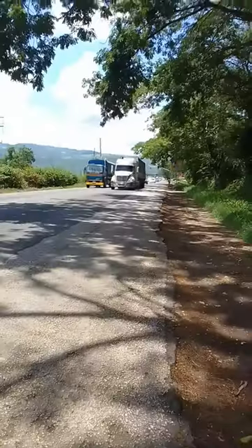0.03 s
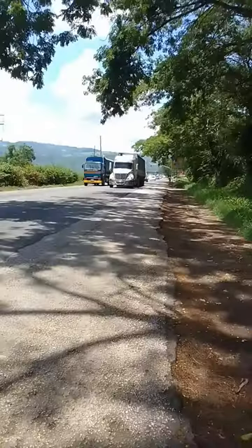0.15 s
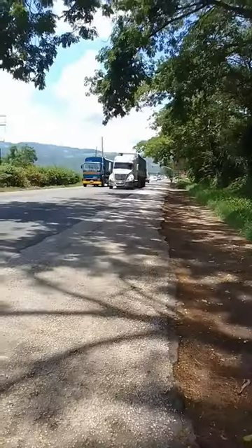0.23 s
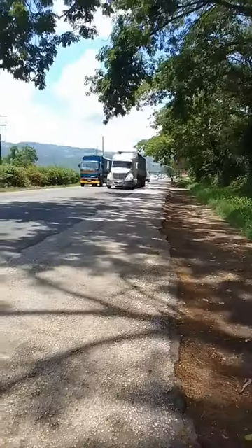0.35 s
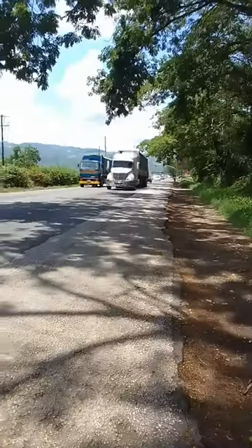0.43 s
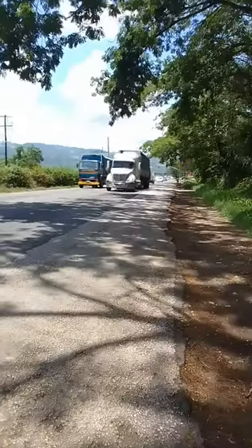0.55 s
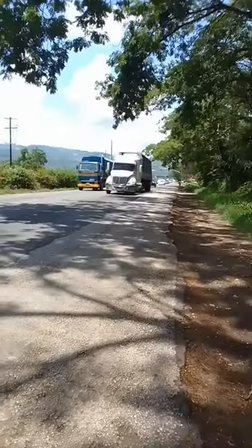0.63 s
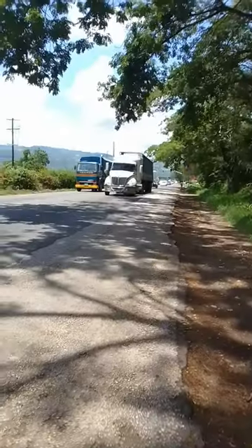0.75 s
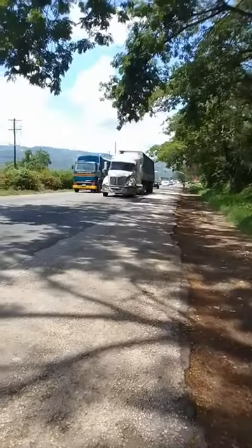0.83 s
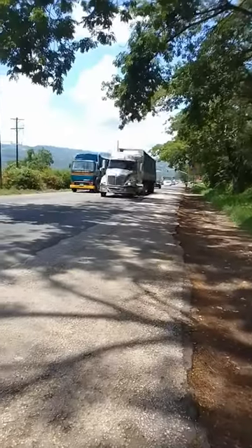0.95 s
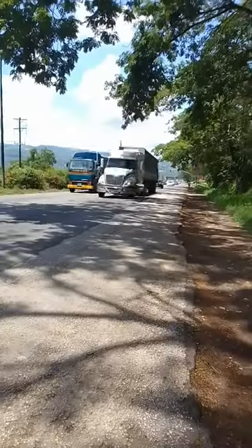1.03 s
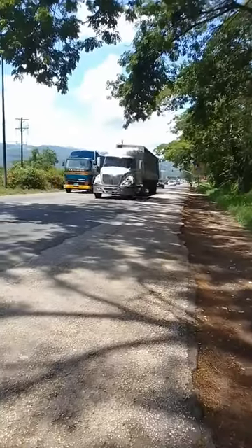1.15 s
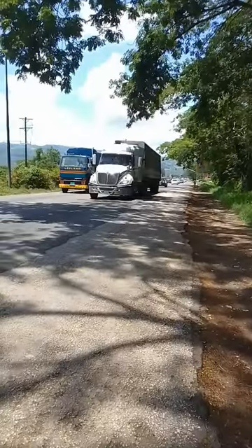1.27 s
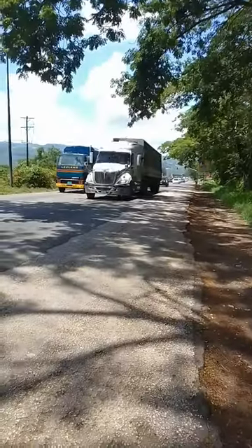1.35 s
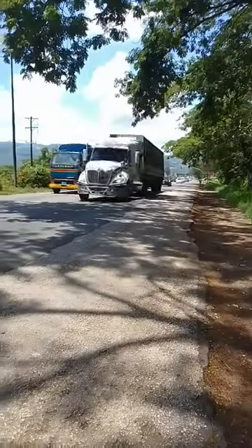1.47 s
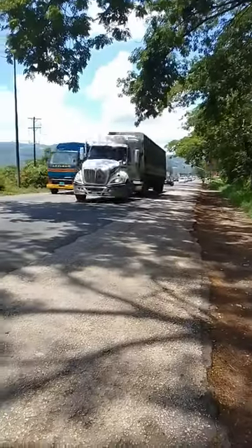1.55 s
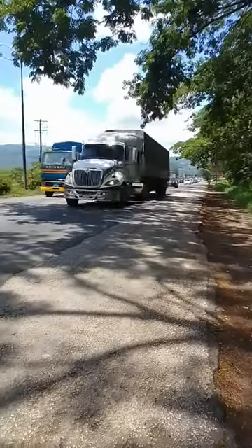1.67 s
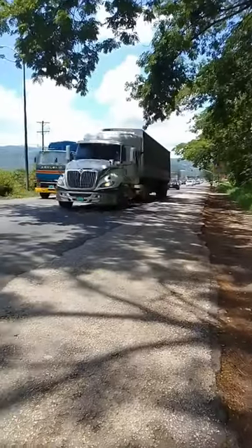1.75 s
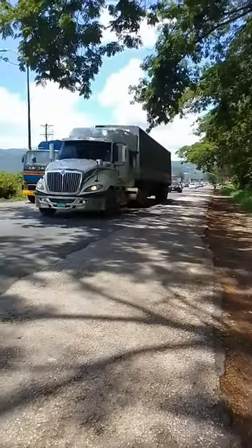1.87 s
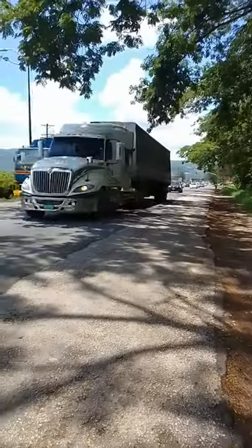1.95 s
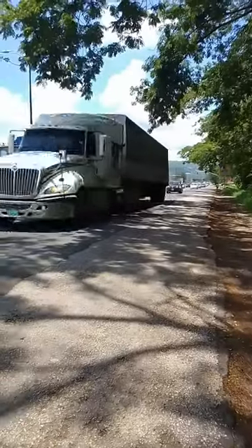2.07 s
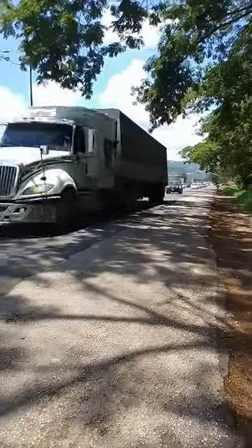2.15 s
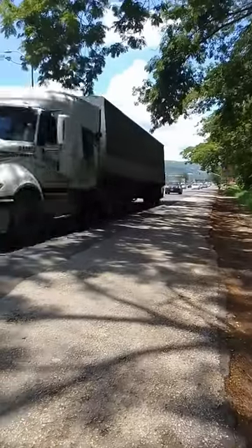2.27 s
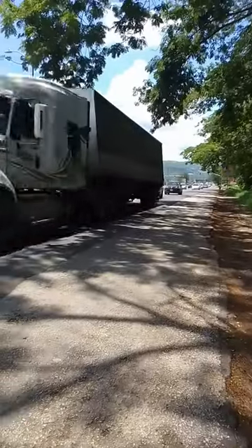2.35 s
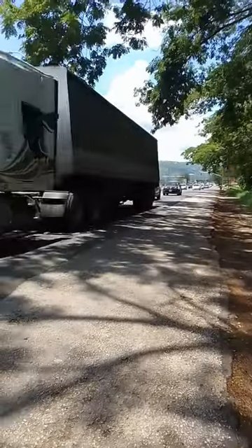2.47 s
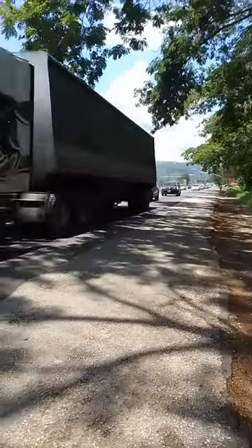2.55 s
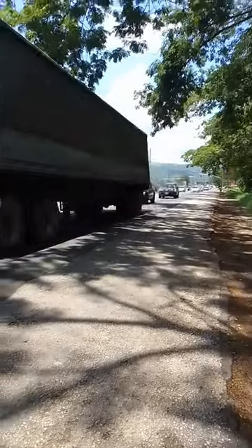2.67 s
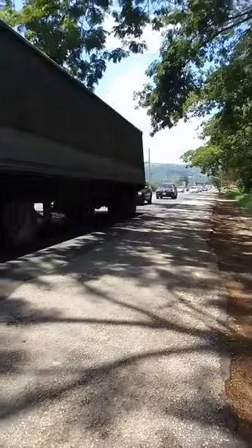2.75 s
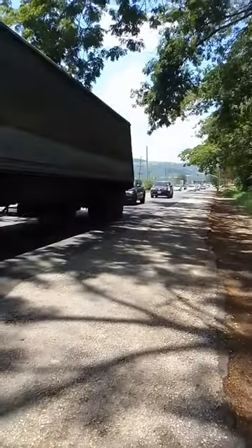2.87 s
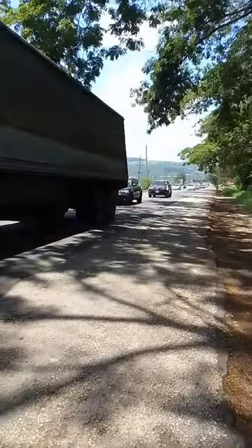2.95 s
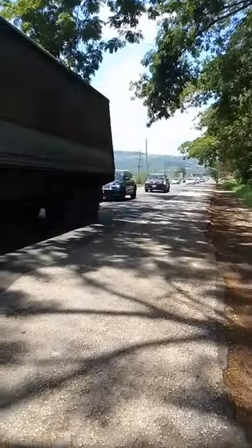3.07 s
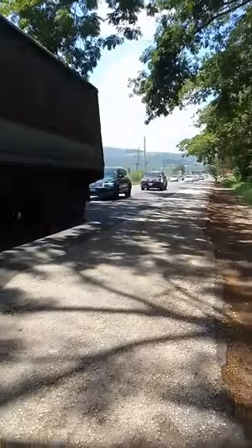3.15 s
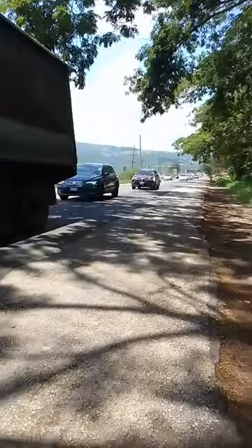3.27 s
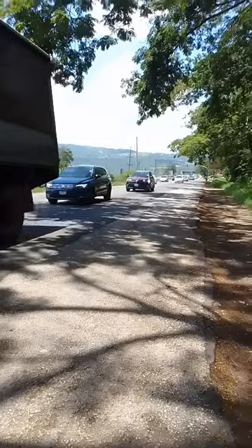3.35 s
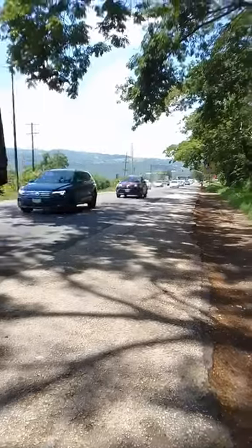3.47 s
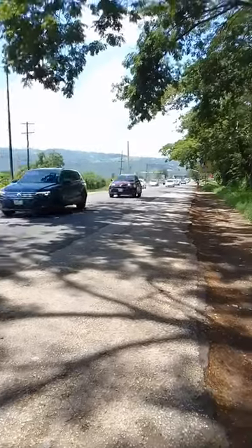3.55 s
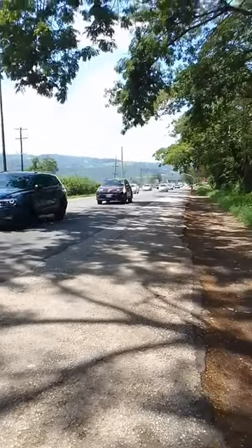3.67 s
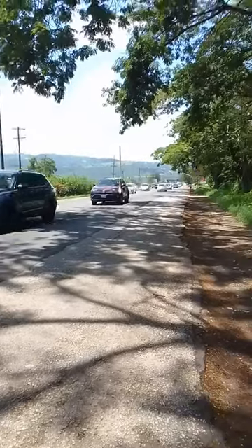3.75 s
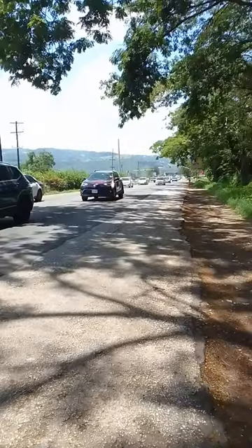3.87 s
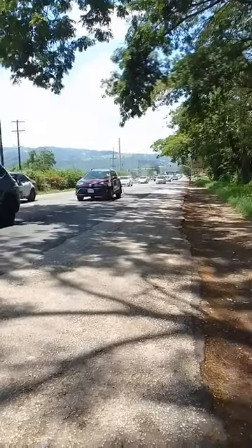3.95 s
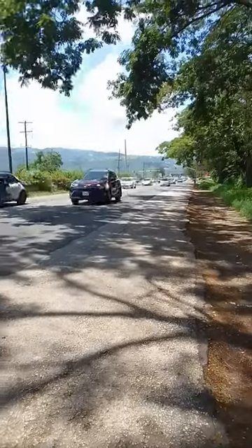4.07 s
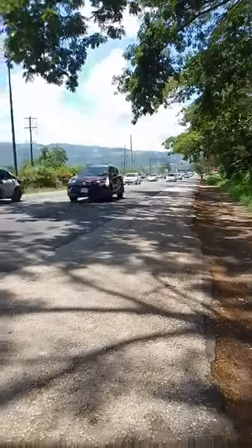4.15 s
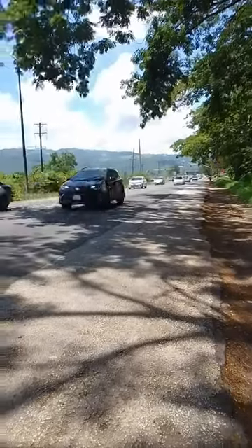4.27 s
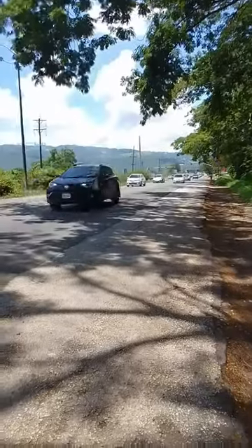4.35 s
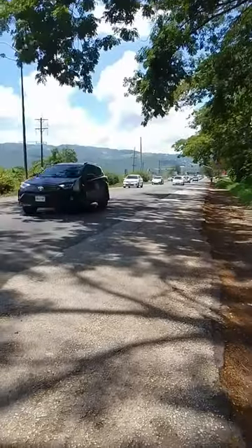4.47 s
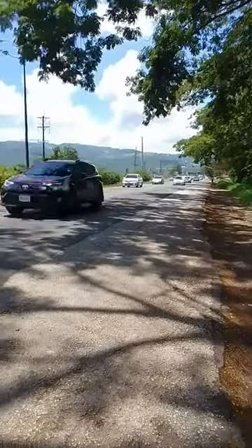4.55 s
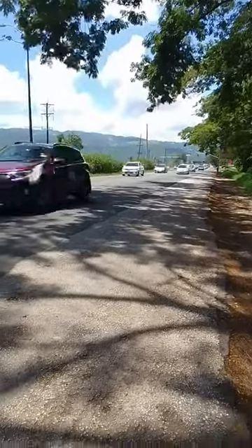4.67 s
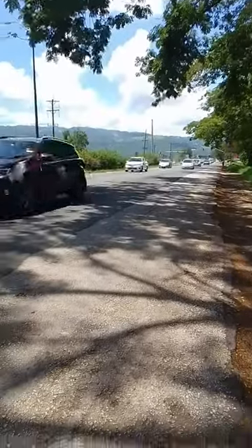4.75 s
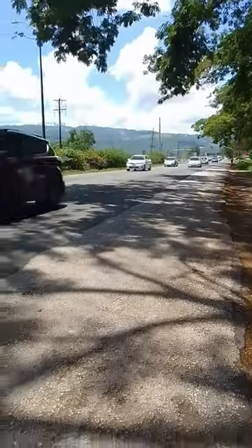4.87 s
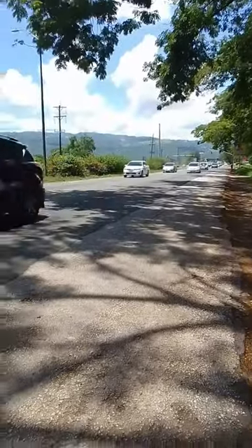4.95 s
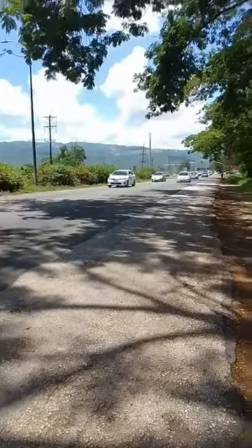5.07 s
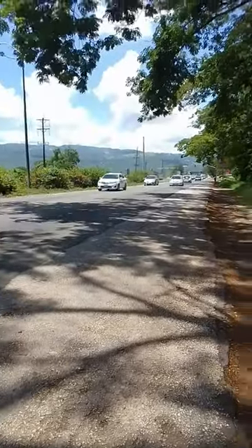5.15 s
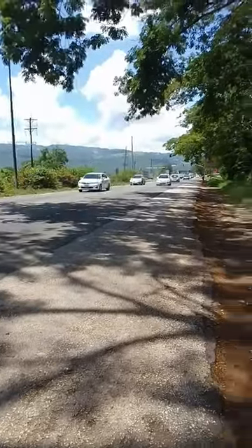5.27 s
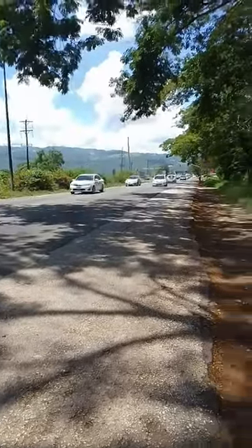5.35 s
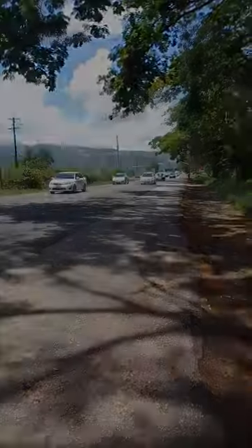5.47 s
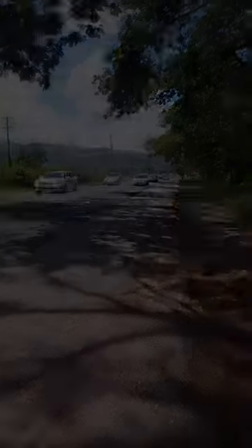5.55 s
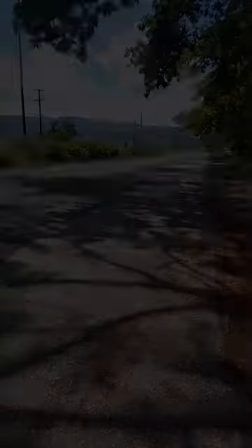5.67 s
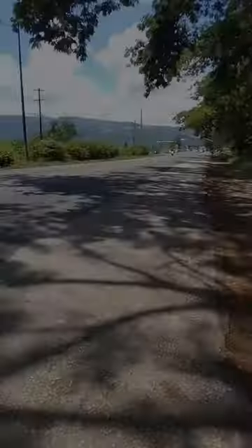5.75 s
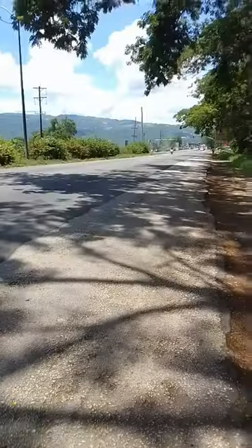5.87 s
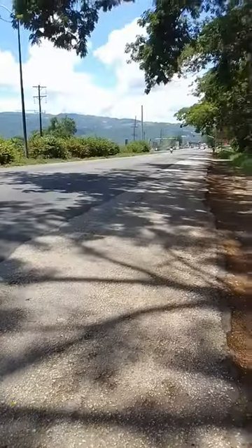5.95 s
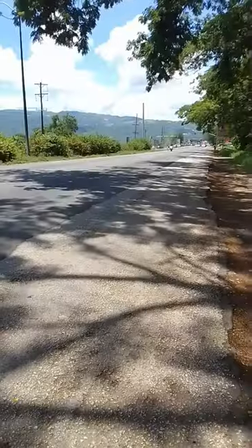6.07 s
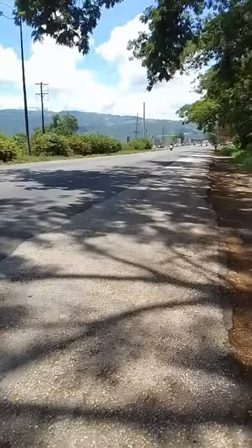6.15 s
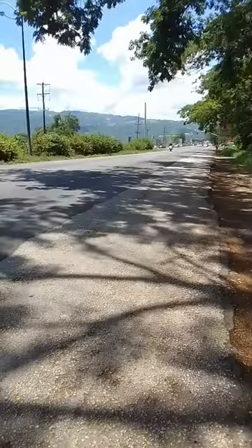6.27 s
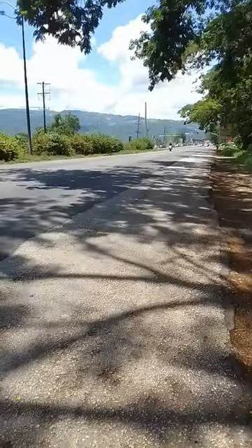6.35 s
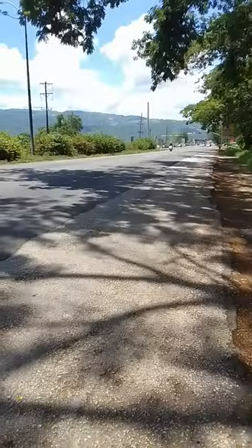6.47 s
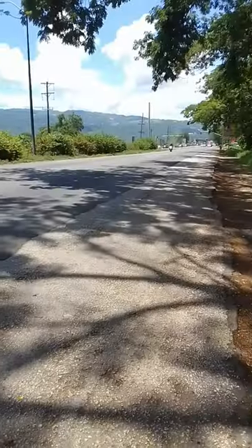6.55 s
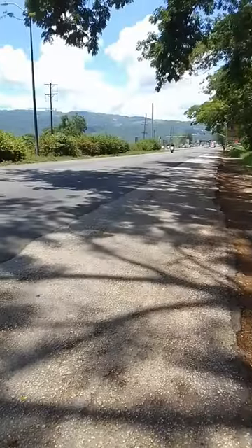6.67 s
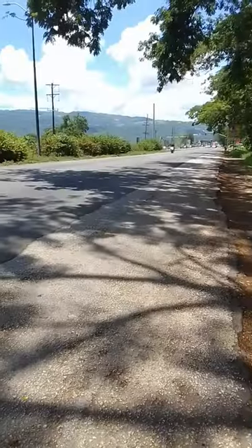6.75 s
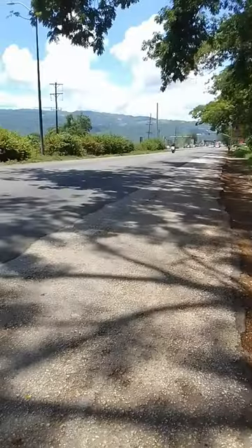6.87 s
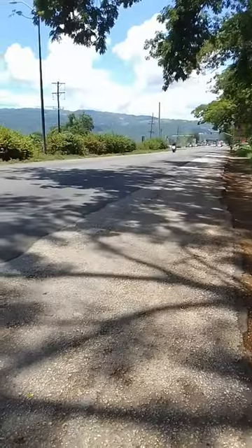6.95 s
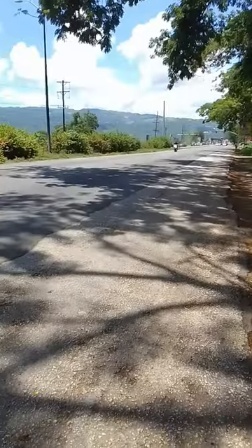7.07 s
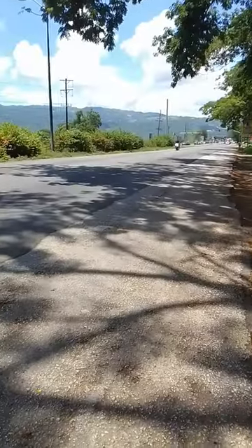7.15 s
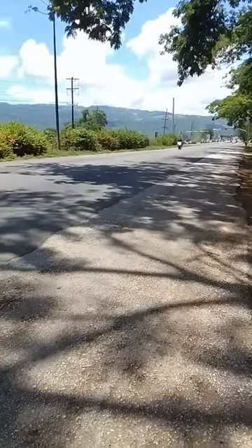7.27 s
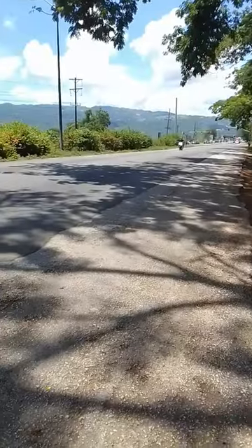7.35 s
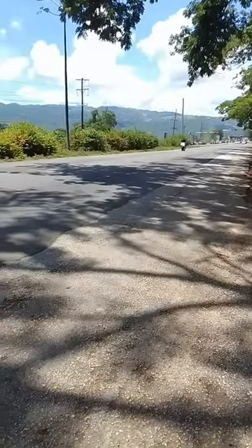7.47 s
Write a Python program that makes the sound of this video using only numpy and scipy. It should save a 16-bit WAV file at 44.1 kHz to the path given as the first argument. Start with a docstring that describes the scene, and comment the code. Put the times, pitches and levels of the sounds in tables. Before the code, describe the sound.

A low thud opens the sound as a diesel semi approaches along an open road, its throbbing drone growing and turning raspier at about 1 second. From 2.4 to 4 seconds it passes close by, with booming exhaust and surges of tyre roar and gritty hiss that overload the small microphone. Three short two-note horn toots sound at about 3, 3.5 and 3.8 seconds, each quieter than the last. Brief puffs of brake air come between 3 and 4.7 seconds, with thin, high squeaks from 3.8 to 5. A second truck passes at around 4.5 to 5 seconds, one cylinder knocking, and starts to recede. At 5.6 seconds everything cuts to silence. From 6.4 seconds a much quieter, distant motorcycle drones over faint road noise, dipping and burbling through a gear change at about 7.3 seconds.

```python
"""A diesel semi bears down and passes close by: booming exhaust, roaring and hissing tyres, three horn toots.
A second truck follows with one knocking cylinder, puffs of brake air and thin squeaks; the small
microphone overloads. After a silent break a distant motorcycle drones and changes gear.
The diesels are firing pulses and throbbing noise, coloured by pipe and block; the tyres are shaped noise;
horn and motorcycle are stacks of wavering harmonics."""
import sys
import numpy as np
from scipy.fft import rfft, irfft, next_fast_len
from scipy.io import wavfile
from scipy.ndimage import map_coordinates

SR = 44100
rng = np.random.default_rng(int(sys.argv[2]) if len(sys.argv) > 2 else 0)


def transcribe(signal):
    """Save signal, clipped to [-1, 1], as a 16-bit WAV file at the path in sys.argv[1]."""
    frames = np.atleast_2d(signal).T
    limited = np.clip(frames, -1, 1)
    pcm = np.round(limited * 32767).astype(np.int16)
    wavfile.write(sys.argv[1], SR, pcm)


N = 331632
T = np.arange(N) / SR

# open-road ambience: freq_hz, level_db
ROAD_BED = [(25, -7), (80, -4.5), (110, -6.5), (165, 8), (260, 0.5), (350, -5), (600, -3), (900, -7),
            (1300, -16.5), (1700, -18), (2300, -30.5), (3200, -38.5), (8000, -42.5), (15700, -44.5)]
# the motorcycle through its gear change: time_s, firing_hz, level_db
BIKE_REVS = [(7.21, 236.1, -19), (7.242, 236.9, -21), (7.344, 217.4, -22.5), (7.37, 204.0, -27.5),
             (7.414, 200, -23.5), (7.452, 216.9, -18), (7.48, 228, -16.5), (7.52, 205.3, -21)]
# its exhaust harmonics: order, level_db
BIKE_HARMONICS = [(1, 1.5), (2, -7), (3, -18.5), (4, -32), (5, -25.5), (7, -43.5), (8, -46.5)]
# its off-throttle burble, and a faint tick: freq_hz, level_db
BURBLE = [(80, -34.5), (150, -1.5), (190, 1), (300, -9), (700, -21), (1500, -60)]
TICK = [(300, -0.5), (1800, 1.5), (5000, -18), (12000, -35)]
# tyre hiss, with the microphone port's peak near 8 kHz: freq_hz, level_db
SEMI_FAR_HISS = [(1800, -37.5), (3000, -13), (4200, -11.5), (5400, -14), (7000, -7.5), (8000, -5),
                 (8500, -2), (9300, -10), (11000, -16.5), (13000, -23), (15700, -31.5)]
SEMI_NEAR_HISS = [(1800, -31), (3000, -4.5), (4200, -5.5), (5600, -5.5), (7200, -1), (8200, 2.5),
                  (9000, -2.5), (10500, -8.5), (13000, -23), (15700, -28)]
TRUCK_HISS = [(1800, -30.5), (3000, -1.5), (4400, -4), (5500, -8.5), (7200, -5.5), (8200, 4), (9000, -4),
              (10500, -12), (13000, -27.5), (15700, -32)]
# close wheels (the semi's drive axles, its trailer's, then a car's): abreast_s, span_s, roar_db, hiss_db
WHEEL_PASSES = [(2.84, 0.069, -15, -20), (3.42, 0.096, -16, -18.5), (3.59, 0.11, -12, -19.5),
                (3.93, .14, -14.5, -24)]
# puffs of brake air: start_s, length_s, level_db
AIR_PUFFS = [(3.05, 0.021, -6), (3.388, 0.019, -20.5), (3.842, 0.0058, -16.5), (4.001, .05, -26),
             (4.163, 0.011, -24), (4.268, 0.018, -23.5), (4.593, 0.025, -19.5), (4.679, .03, -29)]
# their colour: freq_hz, level_db
AIR_HISS = [(1500, -17.5), (2800, 3), (6000, 2), (8300, 7), (11000, -2.5), (15700, -12.5)]
# brake squeaks: start_s, length_s, pitch_hz, level_db
BRAKE_SQUEAKS = [(3.815, 0.085, 11350, -31.5), (4.025, .07, 11100, -32), (4.167, 0.026, 13360, -35.5),
                 (4.257, 0.018, 6460, -27), (4.254, 0.028, 7550, -26), (4.294, .02, 5660, -28.5),
                 (4.33, 0.023, 4200, -29), (4.58, 0.027, 9650, -23.5), (4.612, 0.076, 2560, -29.5),
                 (4.653, 0.028, 9900, -30), (4.678, 0.019, 4440, -27.5), (4.74, 0.023, 2900, -28.5),
                 (4.915, 0.12, 8110, -23.5)]
# engine block rung by the knock: pitch_hz, level_db, t60_s
BLOCK_MODES = [(720, -2.5, 0.011), (970, 0, 0.01), (1222, -7, 0.01), (1590, -13, 0.012)]
# the engine cover muffling each blow: freq_hz, level_db
ENGINE_COVER = [(300, -14.5), (650, -3.5), (1400, -1.5), (2100, -13.0), (3500, -33)]
# horn toots, lower as the vehicle passes: start_s, length_s, level_db, low_pitch_hz, high_pitch_hz
HORN_TOOTS = [(3.029, 0.048, 6, 404.5, 565), (3.495, 0.079, -1.8, 399.7, 558), (3.845, .09, -9.5, 400, 553)]
# each horn's harmonics: order, level_db
LOW_HORN = [(1, 0), (2, -2), (3, -5), (4, 2), (6, -11.5)]
HIGH_HORN = [(1, 3.5), (2, 0), (3, -6), (4, -23.5)]
# exhaust pipe colours: freq_hz, level_db
TRUCK_PIPE = [(25, -22.5), (65, -26.5), (100, -15.5), (150, -9), (190, 0), (240, 1), (300, -9.5),
              (400, -6.5), (520, -14.5), (900, -59.5)]
SEMI_PIPE = [(25, -28), (65, -26.5), (100, -21.5), (135, -7), (150, -10), (185, 0), (235, 1), (270, 1),
             (315, 2.5), (350, -10), (420, -9), (520, -10.5), (900, -61.5)]
# roar of engine block and tyres: freq_hz, level_db
TRUCK_ROAR = [(250, -40.5), (400, -5.5), (600, 0), (730, 5), (860, -5), (930, 6.5), (990, 3.5),
              (1070, -3.5), (1250, -3.5), (1600, -10.5), (2200, -24), (2900, -20.5), (4500, -45)]
SEMI_FAR_ROAR = [(250, -43), (400, -15.5), (450, 1), (560, 7), (640, 4), (720, -4.5), (800, 2.5),
                 (880, -11), (1200, -2.5), (1700, -10), (1950, -16), (2300, -17), (2900, -27), (4500, -49)]
SEMI_NEAR_ROAR = [(250, -34), (400, -2), (500, -2.5), (620, -2.5), (800, -4), (1000, -8), (1250, -8),
                  (1600, -13.5), (2100, -19.5), (2900, -20.5), (4500, -35.5)]
# the semi's injector rasp: freq_hz, level_db
RASP = [(1200, -41.5), (1550, -5.5), (1750, 5), (1950, -7), (2250, 1), (2500, -4), (2800, -9.5),
        (3300, -23.5), (5000, -44)]
# the semi's engine, lowered by Doppler as it passes: time_s, firing_hz
SEMI_REVS = [(0, 71.24), (1.1, 72.84), (2.2, 76.84), (2.65, 77.95), (2.85, 76.84), (3.2, 75.53),
             (3.45, 74.5), (4.2, 68.03)]
# exhaust swells while its stack is near: peak_s, half_length_s, third_order_db, fourth_order_db
STACK_BOOMS = [(2.52, .04, -7.5, -28), (2.65, 0.061, -24, -4.5), (3.17, .08, -4, -11),
               (3.44, .08, -12.5, -22), (3.62, 0.036, -11, -18.5)]
# pass-bys for drive_by(): abreast_s, span_s, level_db, fall_db, ahead_db
SEMI_EXHAUST_PASS, SEMI_ROAR_PASS = (3, 0.86, -6, 6.6, .5), (3, 0.71, -8, 6, 1)
SEMI_TYRE_PASS, TRUCK_TYRE_PASS = (3, 0.7256, -18, 9.5, 4.5), (4.5, 0.87, -27, 10.5, -0.4)
INJECTOR_PASS, FAN_PASS = (2.5, 0.83, -23, 9, 3), (2.5, 0.34, -12.5, 10.5, -0.5)
TRUCK_EXHAUST_PASS, TRUCK_ROAR_PASS = (4.5, 0.62, -15.5, 6.5, 0.5), (4.81, .56, -13.05, 9, .1)

WHEEL_FALL_DB = 10  # per doubling of distance
NOSE_S, NOSE_TURN_S = 2.4, .11  # the semi's nose draws level: its sound turns from far to near


def amp(db):
    """Decibels to gain."""
    return 10 ** (np.asarray(db) / 20)


def unit(x):
    """Scale to rms 1."""
    return x / np.sqrt(np.mean(x ** 2) + 1e-20)


def curves(rows):
    """One automation curve for each column after the time."""
    times, *columns = np.transpose(rows)
    return [np.interp(T, times, column) for column in columns]


def wobble(rate):
    """A smooth random curve, rate knots a second."""
    return map_coordinates(rng.standard_normal(int(N * rate / SR) + 4), [T * rate])


def noise():
    """White noise."""
    return rng.standard_normal(N)


def filtered(x, response):
    """x through a frequency response."""
    size = next_fast_len(N + SR // 2)
    return irfft(rfft(x, size) * response(np.fft.rfftfreq(size, 1 / SR)), size)[:N]


def coloured(x, eq):
    """x through an EQ curve of (freq_hz, level_db) points, at rms 1."""
    freqs, db = np.transpose(eq)
    return unit(filtered(x, lambda hz: amp(np.interp(np.log(hz + 1), np.log(freqs), db))))


def ringing(hz, width_hz):
    """A resonance kept ringing by noise, at rms 1."""
    return unit(filtered(noise(), lambda f: 1 / (1 + ((f - hz) / width_hz) ** 2)))


def blend(a, b, share):
    """Equal-power fade from a to b."""
    share = np.clip(share, 0, 1)
    return np.sqrt(1 - share) * a + np.sqrt(share) * b


def burst(start, length, attack, t60):
    """An envelope that rises, holds and dies away."""
    age = np.maximum(T - start, 0)
    return (1 - np.exp(-age / attack)) * amp(-60 * np.maximum(age - length, 0) / t60)


def crossing(at_s, turn_s):
    """A smooth step from 0 to 1 around a moment."""
    return (1 + np.tanh((T - at_s) / (2 * turn_s))) / 2


def drive_by(abreast_s, span_s, db, fall_db, ahead_db):
    """Pass-by gain: loses fall_db per doubling of distance and beams forward by ahead_db."""
    along = (T - abreast_s) / span_s  # in one span the source travels its own closest distance
    distance = np.hypot(1, along)
    return amp(db - fall_db * np.log2(distance) - ahead_db * along / distance)


def firings(turns, scatter_db, cylinders=6):
    """One pulse per firing; each cylinder has its own strength and every stroke varies."""
    at = np.flatnonzero(np.diff(np.floor(turns)) > 0)
    cylinder_offset = rng.standard_normal(cylinders)[np.arange(len(at)) % cylinders]
    pulses = np.zeros(N)
    pulses[at] = amp(scatter_db * (cylinder_offset + noise()[:len(at)]))
    return unit(pulses)


def throb(turns, depth, decay):
    """A gain that jumps at each firing and sinks over a share of the gap to the next."""
    return unit(1 + depth * np.exp(-(turns % 1) / decay))


def open_road():
    """A quiet bed of low road noise with one faint tick."""
    tick = amp(-45) * burst(6.746, 0.0018, attack=.0005, t60=.015) * coloured(noise(), TICK)
    return tick + amp(-40) * coloured(noise(), ROAD_BED)


def motorcycle(shift_s=7.245, climb_hz_per_s=12, approach_db_per_s=3.5):
    """An exhaust drone climbs and nears, then dulls and burbles as the throttle shuts for the shift."""
    hz, db = curves(BIKE_REVS)
    to_shift = np.maximum(shift_s - T, 0)
    hz, db = hz - climb_hz_per_s * to_shift, db - approach_db_per_s * to_shift
    closed = 0.74 * burst(shift_s, .172, attack=.012, t60=.18)
    jitter = 0.0038 * wobble(60) + 0.036 * closed * wobble(110)
    phase = 2 * np.pi * np.cumsum(hz * (1 + jitter)) / SR
    drone = np.zeros(N)
    for order, order_db in BIKE_HARMONICS:
        closed_db = -7 * closed * np.log2(order)
        waver_db = (0.4 + np.log2(order)) * wobble(25)
        drone += amp(order_db + closed_db + waver_db) * np.sin(order * phase + rng.uniform(0, 2 * np.pi))
    burble = amp(-31) * closed * coloured(noise(), BURBLE)
    return amp(db + 2.2 * closed * wobble(60)) * drone + burble


def thud():
    """A low thud of noise up the road."""
    body = blend(coloured(noise(), SEMI_PIPE), coloured(noise(), SEMI_FAR_ROAR), 0.18)
    return amp(-9) * burst(0.027, .035, attack=.006, t60=.2) * body


def tyres():
    """Roar and gritty hiss swell as each set of wheels goes by."""
    grit = amp(0.73 * wobble(150))
    far, near = coloured(noise(), SEMI_FAR_HISS), coloured(noise(), SEMI_NEAR_HISS)
    hiss = drive_by(*SEMI_TYRE_PASS) * blend(far, near, crossing(NOSE_S, NOSE_TURN_S))
    hiss += drive_by(*TRUCK_TYRE_PASS) * coloured(noise(), TRUCK_HISS)
    roar = np.zeros(N)
    for abreast, span, roar_db, hiss_db in WHEEL_PASSES:
        roar += drive_by(abreast, span, roar_db, WHEEL_FALL_DB, 0) * coloured(noise(), SEMI_NEAR_ROAR)
        hiss += drive_by(abreast, span, hiss_db, WHEEL_FALL_DB, 0) * coloured(noise(), SEMI_NEAR_HISS)
    return roar + grit * hiss


def brakes():
    """Air escapes in short puffs and the brakes ring in thin squeaks."""
    air = coloured(noise(), AIR_HISS)
    puffs = sum(amp(db) * burst(start, length, attack=0.0023, t60=0.18)
                for start, length, db in AIR_PUFFS)
    squeaks = sum(amp(db) * burst(start, length, attack=.35 * length, t60=.12) * ringing(hz, 230)
                  for start, length, hz, db in BRAKE_SQUEAKS)
    return air * puffs + squeaks


def knocks(cycles, cycle_hz, rebound_s=.0047, rebound_db=-2):
    """Once a cycle a piston slaps the block and rebounds a few ms later."""
    age = (cycles % 1) / cycle_hz
    cycle = (np.floor(cycles) - np.floor(cycles[0])).astype(int)
    blows = np.zeros(N)
    for delay, blow_db in [(0, 0), (rebound_s, rebound_db)]:
        t = np.maximum(age - delay, 0)
        for hz, db, t60 in BLOCK_MODES:
            scatter_db, detune = rng.standard_normal((cycle[-1] + 1, 2))[cycle].T
            envelope = amp(blow_db + db + scatter_db - 60 * t / t60)
            blows += envelope * np.sin(2 * np.pi * hz * (1 + 0.05 * detune) * t)
    return coloured(blows, ENGINE_COVER)


def second_truck(knock_s=4.478, cycle_hz=10.55):
    """Exhaust and roar of a passing six-cylinder diesel with one knocking cylinder."""
    cycles = (T - knock_s) * cycle_hz
    turns = cycles * 6
    exhaust = coloured(blend(noise(), firings(turns, scatter_db=2.5), 0.12), TRUCK_PIPE)
    roar = coloured(noise() * throb(turns, depth=0.41, decay=.3), TRUCK_ROAR)
    roar = blend(roar, knocks(cycles, cycle_hz), .3)
    return drive_by(*TRUCK_EXHAUST_PASS) * exhaust + drive_by(*TRUCK_ROAR_PASS) * roar


def horn():
    """Two buzzing diaphragms sound together; each toot lingers briefly along the road."""
    toots = np.zeros(N)
    for start, length, db, *pitches in HORN_TOOTS:
        chord = np.zeros(N)
        for hz, harmonics in zip(pitches, [LOW_HORN, HIGH_HORN]):
            phase = 2 * np.pi * np.cumsum(hz * (1 + .011 * wobble(90))) / SR
            for order, order_db in harmonics:
                chord += amp(order_db) * np.sin(order * phase + rng.uniform(0, 2 * np.pi))
        toots += amp(db) * unit(chord) * burst(start, length, attack=0.011, t60=0.063)
    return toots


def semi_grille(turns, load_db=6):
    """Injectors rasp at each firing and the cooling fan growls as the nose goes by."""
    rasp = coloured(noise() * throb(turns, depth=1.5, decay=.25), RASP)
    load = amp(load_db * (crossing(1.15, .015) - 1))  # the driver steps on it
    fan = ringing(785, width_hz=27)
    return load * drive_by(*INJECTOR_PASS) * rasp + drive_by(*FAN_PASS) * fan


def semi_stack(firing_hz):
    """Two orders of the firing rate boom out of the exhaust stack, unsteady under load."""
    phase = 2 * np.pi * np.cumsum(firing_hz * (1 + .014 * wobble(30))) / SR
    swells = sum(amp(levels)[:, None] / np.cosh((T - peak) / half) ** 2
                 for peak, half, *levels in STACK_BOOMS)
    third, fourth = (np.sqrt(2) * swell * amp(2.5 * wobble(35)) for swell in swells)
    return third * np.sin(3 * phase) + fourth * np.sin(4 * phase)


def semi(turns, reflection_s=0.002076, screen_db=-6.5):
    """Pulsing exhaust and throbbing roar: hollow up the road, filling out as the semi draws level."""
    nearness = crossing(NOSE_S, NOSE_TURN_S)
    exhaust = coloured(blend(noise(), firings(turns, scatter_db=3.5), 0.16), SEMI_PIPE)
    far = coloured(noise() * throb(turns, depth=0.37, decay=.25), SEMI_FAR_ROAR)
    # the road reflection cancels evenly spaced bands
    reflection = filtered(far, lambda hz: np.exp(-2j * np.pi * hz * reflection_s))
    hollow = 0.63 * (1 - nearness)
    far = (far - hollow * reflection) / np.sqrt(1 + hollow ** 2)
    near = coloured(noise() * throb(turns, depth=.6, decay=.25), SEMI_NEAR_ROAR)
    roar = blend(far, near, nearness)
    screen = amp(screen_db * crossing(4.02, 0.13))  # once its tail is by, the trailer screens the engine
    return screen * (drive_by(*SEMI_EXHAUST_PASS) * exhaust + drive_by(*SEMI_ROAR_PASS) * roar)


def scene(cut_s=5.637, resume_s=6.435):
    """Two trucks, a hard cut to silence, then the motorcycle on the open road."""
    firing_hz = curves(SEMI_REVS)[0]
    turns = np.cumsum(firing_hz) / SR  # one turn per firing
    trucks = semi(turns) + second_truck() + semi_stack(firing_hz) + semi_grille(turns)
    trucks += horn() + brakes() + tyres() + thud()
    fade_out = np.clip((cut_s - T) / .003, 0, 1)
    fade_in = np.clip((T - resume_s) / .002, 0, 1)
    return (fade_out * trucks + fade_in * (motorcycle() + open_road()))[None]


def record(dry, ceiling=0.82, hardness=4.6, low_cut_hz=100, deep_db=-19.0, top_hz=15780):
    """The microphone rounds off loud peaks, thins the deep bass and keeps nothing above its band limit."""
    squashed = dry[0] / (1 + np.abs(dry[0] / ceiling) ** hardness) ** (1 / hardness)
    low_cut = lambda hz: np.maximum(1 - 1 / (1 + (hz / low_cut_hz) ** 6), amp(deep_db))
    return filtered(squashed, lambda hz: low_cut(hz) * (hz < top_hz))[None]


dry = scene()
out = record(dry)
transcribe(out)
```